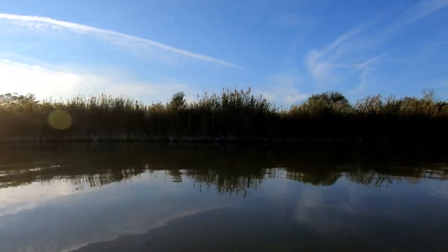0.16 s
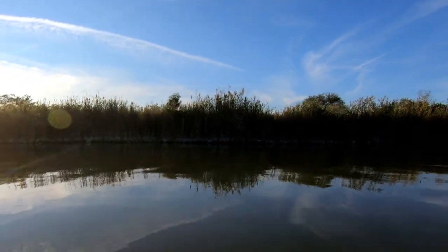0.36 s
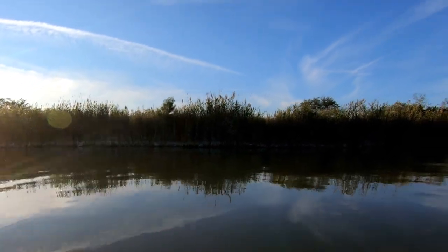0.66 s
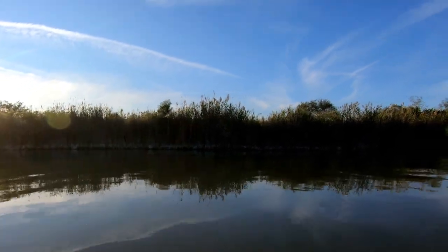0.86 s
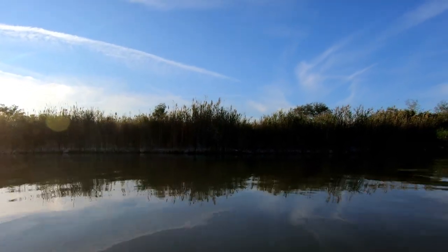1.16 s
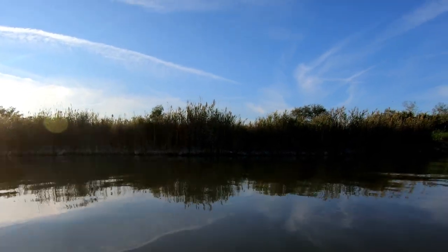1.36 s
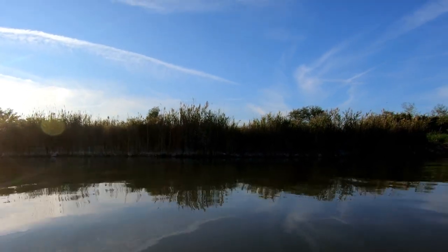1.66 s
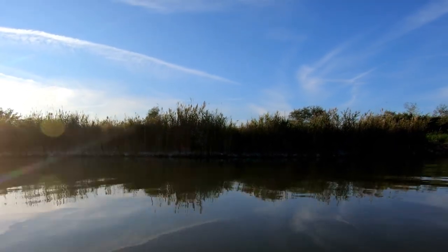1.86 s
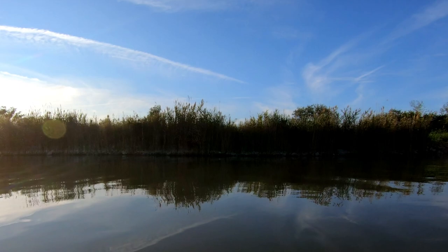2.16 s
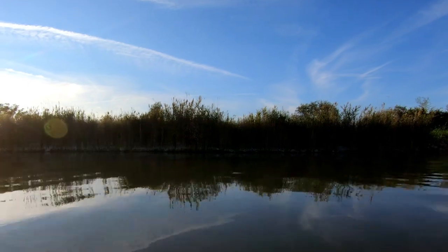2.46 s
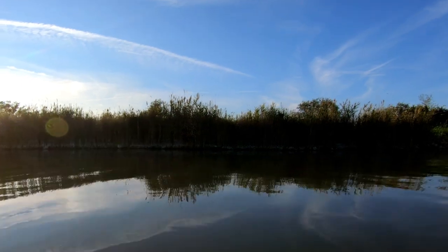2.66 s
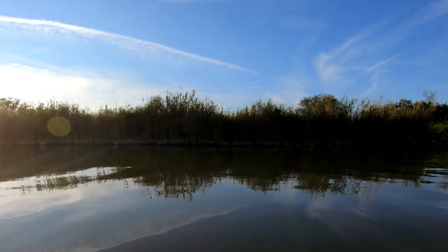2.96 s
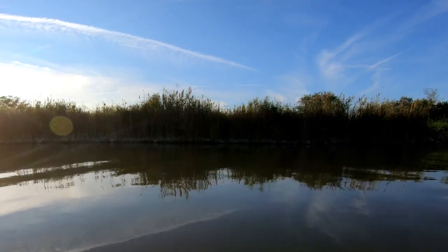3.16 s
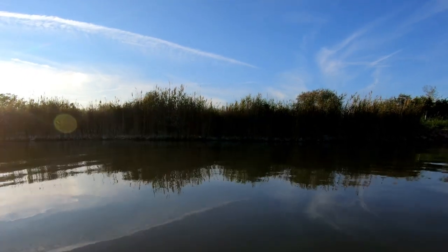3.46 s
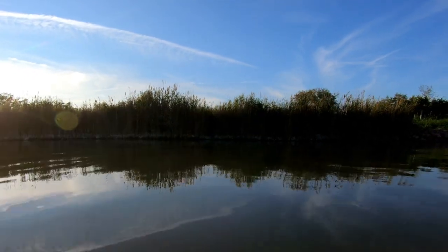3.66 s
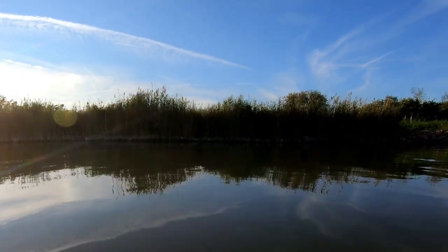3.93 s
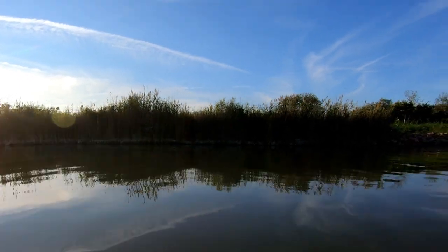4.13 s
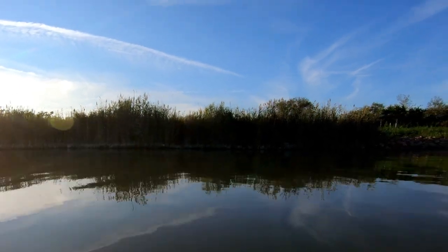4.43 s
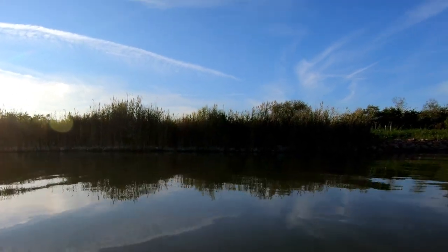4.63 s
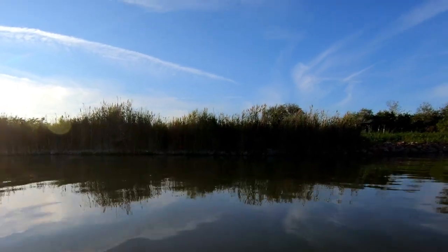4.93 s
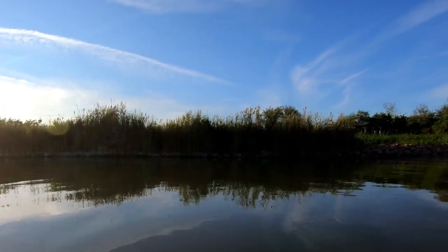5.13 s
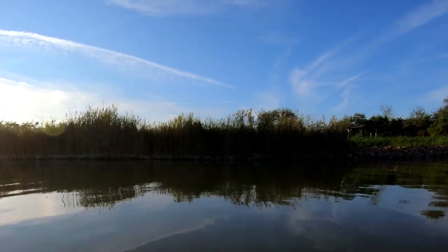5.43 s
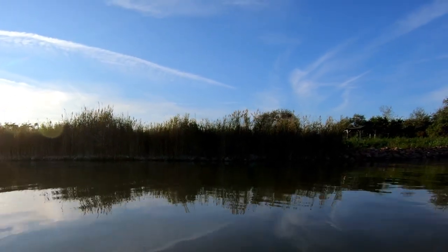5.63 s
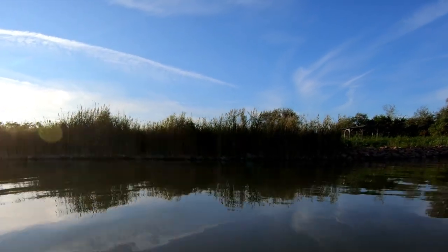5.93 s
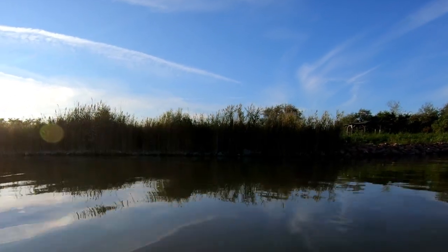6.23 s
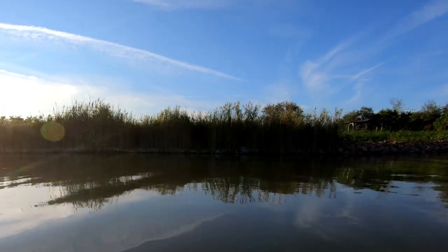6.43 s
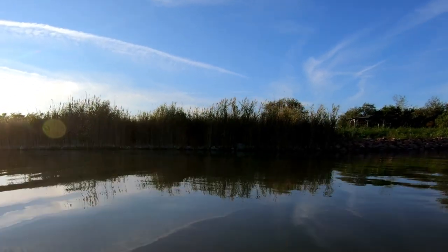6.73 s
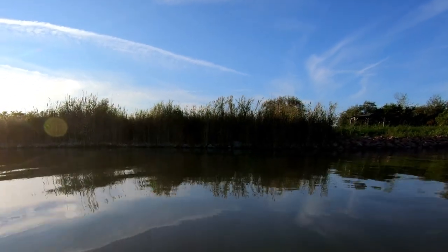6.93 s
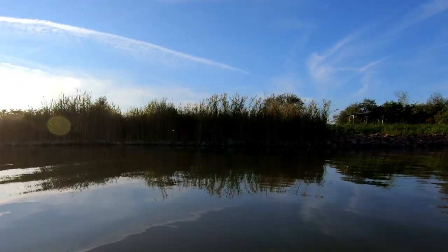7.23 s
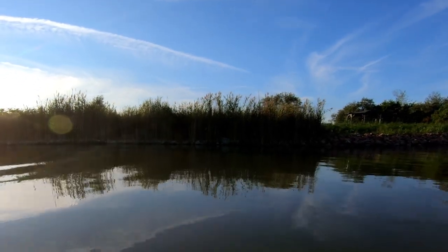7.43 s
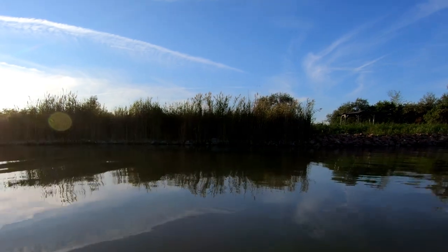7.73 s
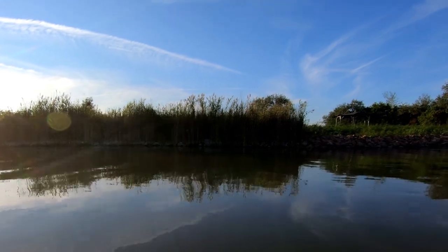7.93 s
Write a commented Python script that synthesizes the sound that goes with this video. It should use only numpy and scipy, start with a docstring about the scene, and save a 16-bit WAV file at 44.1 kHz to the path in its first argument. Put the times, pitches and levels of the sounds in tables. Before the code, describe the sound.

Paddling heard from inside an open boat. The clip opens mid-stroke with strong wind rumble and trickling drips, then swirls return about every two seconds, bubbling and splashing. Quiet glides between them hold single drops and small hull taps. A hard wooden-sounding rattle knock comes late, before a last splashy stroke. Distant low engine, very faint bird whistles and thin hiss stay underneath.

```python
"""A calm lake, where a canoe is paddled along. Each stroke churns up bubbles, made of short fading tones and noise.
Splashes, drops and knocks are bursts of random impacts that set water, air pockets or the hull ringing.
The open hull rings with standing waves across its width; light air buffets the left and right microphone ports.
Behind lie a distant rumble, a chugging engine made of filtered pulses, a small whistling bird
and a soft high hiss that comes and goes."""
import sys
import numpy as np
from scipy import signal
from scipy.fft import rfft, irfft, next_fast_len
from scipy.io import wavfile
from scipy.ndimage import uniform_filter1d, map_coordinates

SR = 44100
rng = np.random.default_rng(int(sys.argv[2]) if len(sys.argv) > 2 else 0)


def put_to_file(sound):
    """Save the sound as 16-bit audio at rate SR, in the file named by the first command-line argument."""
    columns = np.atleast_2d(sound).T  # one column per channel
    safe = np.clip(columns, -1, 1)
    whole_steps = np.round(safe * 32767)
    wavfile.write(sys.argv[1], SR, whole_steps.astype(np.int16))


N = 356769

# In all tables, pan_db is left minus right; levels in spectra are relative.
# the blade enters the water: start_s, hold_s, fall_db_per_s, slosh_db, froth_db
CATCHES = [(1.475, 0.009, 84, -50, -68), (3.543, .013, 23.5, -50, -65.5), (5.176, 0.061, 124.5, -47.5, -69),
           (7.512, 0.012, 71, -50.5, -82)]
CATCH_RISE_DB_PER_S = 109
# the blade swirls and lifts out at the end of each pull: start_s, length_s, slosh_db, froth_db
SWIRLS = [(.01, 0.24, -53, -72.5), (2.01, 0.14, -49, -61), (3.794, 0.21, -47, -72), (5.733, 0.29, -49, -72),
          (7.73, 0.15, -51.5, -72.5)]
SWIRL_RISE_DB_PER_S, SWIRL_FALL_DB_PER_S = 227, 72.5
FROTH_LAG_S = 0.069  # fine bubbles surface after the slosh
# the swirl's wave reaches the hull; its level is relative to the swirl's slosh
LAP_DELAY_S, LAP_WIDTH_S, LAP_DB = 0.38, 0.046, -6.5
IDLE_SLOSH_DB, IDLE_FROTH_DB = -64, -94.5  # the hull gliding between strokes
# colour of the slosh: pitch_hz, level_db
SLOSH_SPECTRUM = [(100, -38.5), (220, 8), (350, 12), (550, 7.5), (900, -1.5), (1400, 2.5), (2200, -9),
                  (4000, -25.5)]
# colour of the fine spray: pitch_hz, level_db
SPRAY_SPECTRUM = [(500, -26), (1000, -13), (1800, 27), (2800, -10), (4000, -24), (8000, -39), (10000, -25),
                  (12000, -31), (15000, -23)]

# the blade slaps and throws water: start_s, level_db, t60_s (time to fall 60 dB), pitch_hz, pan_db
SPLASHES = [(0.034, -37.5, 0.21, 1480, -1), (0.077, -49, 0.23, 1080, -16), (0.302, -50.5, 0.13, 1950, 11),
            (0.344, -40, 0.2, 1900, 22.5), (0.434, -36.5, 0.23, 1690, 8), (.651, -43, 0.13, 1810, 9),
            (1.048, -36.5, .1, 2050, 9.5), (1.055, -36.5, 0.041, 1790, 17), (1.298, -52.5, 0.18, 2320, 6),
            (1.97, -45, 0.15, 1320, -15), (2.224, -44, 0.22, 1850, 18), (2.71, -50.5, 0.21, 2920, 8),
            (3.12, -50, 0.16, 1700, 16), (3.498, -41, 0.089, 1590, -9), (3.934, -37, 0.065, 1800, 2.5),
            (4.029, -37, 0.15, 1910, 6.5), (4.7, -54.5, 0.41, 4200, 8), (4.785, -48, .1, 1470, 5.5),
            (5.12, -37.5, .2, 1760, 12.5), (5.191, -38.5, 0.19, 1750, 11), (5.297, -41.5, 0.088, 1850, 6),
            (5.33, -36.5, 0.071, 1730, 4.5), (5.819, -36.5, .14, 1790, 6.5),
            (5.976, -36.5, 0.11, 1730, 7.5), (6.075, -33.5, 0.077, 1880, 11),
            (7.067, -48.5, 0.45, 1800, 9.5), (7.495, -36, .12, 1580, -12), (7.666, -46.5, 0.13, 1570, 0),
            (7.899, -37.5, 0.41, 1810, 12)]
# colour of a splash at the pitch below: pitch_hz, level_db
SHOWER_SPECTRUM = [(500, -4.5), (1000, 7), (1800, 6), (3000, -1), (4200, -11), (5500, -5.5), (9000, -12.5),
                   (11000, -17), (15000, -41)]
SHOWER_HZ = 1800
PLIP_DB, PLIP_SPREAD, PLIP_CYCLES = 0, 0.45, 18  # tiny bubbles: level, spread of log pitch, cycles per t60

# the largest bubbles, with a few brief rings of the hull near 1.3 kHz: start_s, pitch_hz, level_db, t60_s,
# pan_db
BUBBLES = [(.027, 2000, -31, 0.0094, -11), (0.072, 1930, -40.5, 0.033, -1), (.075, 770, -29, 0.011, -16),
           (.088, 950, -38.5, 0.035, -12), (0.135, 1500, -52, .02, -1), (.432, 2260, -54, 0.018, -5),
           (0.45, 1300, -36.5, 0.039, -2.5), (.492, 2280, -50, 0.018, 10), (.507, 2650, -56, 0.017, 7),
           (.522, 2440, -46.5, 0.023, -6), (.542, 1355, -35.5, 0.015, -3), (.543, 2320, -49, 0.024, -1),
           (.583, 684, -41, 0.027, -1), (.659, 1830, -41, 0.014, -7), (.743, 2470, -55, 0.049, -4),
           (0.812, 1310, -47, 0.13, -14), (0.92, 1600, -43, 0.01, -2), (1.02, 2660, -63, 0.03, -8),
           (1.332, 2580, -50.5, 0.011, 15), (1.512, 2480, -62, 0.046, 6), (1.573, 1720, -47, 0.036, 4),
           (1.664, 1442, -33.5, 0.083, -8), (1.7, 3030, -48.5, 0.015, 1), (1.762, 1490, -44, 0.024, 2),
           (1.988, 1210, -44, 0.014, 12), (2.136, 1298, -26.5, 0.06, -14), (2.158, 553, -39, 0.068, 2),
           (2.308, 1326, -38.5, 0.049, 9), (2.389, 3150, -57, 0.016, 15), (2.716, 3560, -43.5, 0.007, 13),
           (2.954, 2620, -55, 0.025, 4), (3.29, 1070, -43, 0.051, -6), (3.318, 2160, -52, 0.018, -8),
           (3.424, 2380, -54, .02, 9), (3.474, 2350, -53.5, 0.029, -4), (3.501, 1250, -36, 0.086, 4),
           (3.736, 3200, -42.5, 0.011, -17), (3.83, 1640, -39, 0.021, 0), (3.934, 964, -35, 0.065, 10),
           (3.935, 1470, -29.5, 0.0095, 14), (3.935, 2600, -37, 0.0075, 22), (3.948, 2800, -46, 0.016, -8),
           (3.985, 2840, -53, .02, 4), (3.999, 733, -34.5, 0.1, 8), (4.004, 1526, -29.5, 0.028, 14),
           (4.031, 1240, -40, 0.083, -8), (4.04, 3250, -44, .012, 14), (4.133, 1950, -43, .018, 12),
           (4.181, 2220, -37, 0.039, 0), (4.255, 2060, -48.5, .025, -2), (4.34, 2320, -44, 0.037, -4),
           (4.354, 1945, -38, 0.034, -34), (4.387, 1490, -45, 0.085, 0), (4.784, 674, -38.5, 0.035, 6),
           (4.785, 483, -35.5, 0.034, -4), (4.841, 2170, -49, 0.021, -4), (4.887, 2220, -50, 0.028, 2),
           (4.946, 2470, -50, 0.046, -4), (5.182, 2270, -47, .015, 2), (5.218, 1090, -36, 0.019, 21),
           (5.244, 1510, -38, 0.036, 0), (5.622, 1930, -48, 0.019, -13), (5.701, 2030, -48, 0.019, -7),
           (5.649, 1527, -44.5, 0.036, -15), (5.773, 1120, -29, 0.013, -8), (5.826, 1230, -38, 0.023, -15),
           (5.923, 2650, -58, .012, 10), (5.94, 1260, -43, 0.017, 8), (5.983, 1055, -29.5, 0.034, 27),
           (6.047, 2150, -18.5, 0.0042, 24), (6.076, 1350, -43, 0.027, 24), (6.161, 2760, -48, 0.013, -9),
           (6.207, 1300, -35, 0.025, 1), (6.242, 1990, -47.5, 0.032, -10), (6.385, 1790, -43, 0.031, -5),
           (6.447, 2200, -45, 0.03, -3), (6.652, 1550, -46, 0.025, 10), (6.667, 2720, -60, .025, 9),
           (7.065, 997, -44, 0.065, 15), (7.408, 1920, -49, 0.041, -9), (7.422, 2820, -50, 0.007, -17),
           (7.499, 1227, -39, 0.058, -3), (7.668, 2340, -52.5, 0.049, -1), (7.67, 703, -40.5, 0.081, 3),
           (7.704, 1300, -34, 0.032, 1), (7.753, 1240, -37.5, 0.13, -4), (7.797, 1490, -36.5, 0.035, -1),
           (7.821, 1790, -44.5, 0.078, 11), (7.901, 2750, -32.5, 0.0039, 14), (7.999, 2120, -51, 0.02, 12)]
# air pockets that open at the surface: start_s, start_hz, end_hz, length_s, level_db, pan_db
GLUGS = [(0.311, 1470, 2060, 0.025, -42.5, 2), (1.912, 986, 1460, 0.024, -45, -15),
         (2.166, 2120, 2720, .022, -44.5, 20), (2.226, 1250, 2220, .016, -46, 13),
         (2.313, 1290, 2320, 0.046, -46.5, 6), (3.086, 1380, 2220, .04, -52.5, 18),
         (5.904, 1680, 2470, 0.019, -46.5, 18), (6.045, 2020, 3020, 0.011, -36.5, 20),
         (6.079, 1184, 1750, .018, -37, 23), (6.207, 1420, 2780, 0.027, -48.5, 14)]
# drops hitting the lake: start_s, tick_db, tick_hz, spatter_t60_s, plop_db, pan_db
DROPS = [(.170, -38, 6500, 0.025, -66, 11), (0.211, -49, 8000, 0.0054, -67, 11),
         (.264, -40, 8350, 0.037, -53, 11), (.299, -39, 8500, 0.033, -55, 0),
         (0.346, -31.5, 7800, 0.0098, -37, 4), (.377, -40, 6900, 0.012, -30, 8),
         (0.4554, -42, 5500, .04, -30, -18), (0.5557, -46.5, 6100, 0.009, -57, 10),
         (0.6505, -47.5, 6000, 0.023, -53, -8), (1.048, -43, 7640, 0.037, -39, 6),
         (1.177, -51.5, 4650, .02, -65, 10), (1.309, -45, 3960, 0.012, -65, 8),
         (1.4148, -40.5, 3460, .006, -68, 7), (2.13, -41, 5360, 0.0055, -53, 15),
         (2.203, -32, 3000, 0.0026, -18.5, 22), (2.2195, -48, 5500, .005, -60, 18),
         (2.2515, -46, 3200, 0.012, -32, 16), (2.3027, -47, 5000, .008, -45, 10),
         (2.4556, -39, 3760, 0.0034, -77, 13), (2.708, -44, 4000, .035, -70, 6),
         (3.057, -44, 2970, 0.0088, -56, 10), (3.1331, -64, 3970, 0.021, -34, 27),
         (3.199, -47.5, 4700, 0.0046, -41, 7), (3.5822, -48, 4800, .005, -65, -8),
         (3.918, -44, 4700, .008, -53, -8), (3.95, -34.5, 6300, 0.0094, -55, -21),
         (4.0205, -36.5, 4700, 0.0069, -48, 13), (4.026, -49, 6950, 0.039, -55, 4),
         (4.0522, -48, 3200, 0.012, -28, 10), (4.119, -36, 3200, 0.02, -47, 6),
         (4.1337, -42, 7700, 0.0063, -42, 8), (4.148, -45, 10100, 0.016, -65, 1),
         (4.2868, -44, 7740, .006, -47, 9), (4.4505, -49, 5700, 0.012, -69, -12),
         (4.604, -53.5, 4540, 0.014, -72, 3), (4.6427, -47, 6000, 0.0045, -62, 2),
         (4.6766, -44.5, 3550, 0.009, -65, 5), (4.743, -46, 5330, .012, -65, -2),
         (4.779, -40.5, 4030, 0.021, -48, 2), (5.081, -50, 6000, .03, -62, 3),
         (5.0988, -36.5, 5240, 0.0022, -60, 6), (5.128, -50, 8440, 0.04, -51, 3),
         (5.1986, -41, 3000, .04, -53, 1), (5.681, -38.5, 8500, 0.026, -52, 3),
         (5.7303, -33, 6600, 0.012, -45, -6), (5.8022, -38, 4000, 0.022, -50, 4),
         (5.8192, -36.5, 5540, .045, -50, 4), (6.045, -29, 5700, 0.0085, -29, 9),
         (6.0743, -38, 3240, .006, -30, 14), (6.202, -50, 6530, 0.054, -70, 5),
         (6.311, -46.5, 4340, 0.0064, -65, 2), (6.347, -51, 5000, .02, -41, -1),
         (6.3934, -52, 5500, 0.04, -50, -18), (6.642, -51, 5600, 0.044, -60, 5),
         (6.734, -46, 6000, 0.022, -65, -7), (6.8817, -50.5, 4700, 0.0056, -65, 10),
         (6.954, -52.5, 4970, 0.032, -68, 8), (7.28, -52, 4100, 0.012, -65, 0),
         (7.505, -45, 4230, 0.011, -55, -3), (7.5852, -45, 4930, .006, -65, -7),
         (7.6562, -43, 4100, 0.0047, -56, 0), (7.694, -45, 6960, 0.033, -50, -8),
         (7.7189, -40, 7700, .04, -62, 2), (7.77, -44, 9100, 0.025, -58, 3),
         (7.8116, -47, 8500, .02, -55, 13), (7.8406, -39.5, 6900, .045, -32, 7),
         (7.874, -43, 8500, .025, -38, 1), (7.9005, -31, 9000, 0.0036, -45, 14),
         (7.932, -41.5, 8500, .05, -46, 3), (7.97, -45, 7900, .04, -55, 3), (7.992, -48, 8450, .04, -60, 6)]
TICK_Q, SNAP_DB = 5, -6  # sharpness of a drop's ring; its broad snap relative to the ring

# blows on the hull, parts relative to the rattle: start_s, rattle_db, rattle_t60_s, thud_db, thud_hz,
# crack_db, cross_ring_db
KNOCKS = [(1.463, -46, 0.24, 14, 360, -8, -9), (1.9723, -35.5, 0.13, 2.5, 306, -9.5, -17),
          (3.371, -37, 0.1, 5, 323, -10.5, -27), (3.999, -32.5, 0.059, 4, 303, -26, -12),
          (4.783, -37, 0.086, -3, 485, -22, -18), (6.7511, -19, 0.1, -21.5, 340, -8.5, -20.5),
          (7.228, -47, 0.21, 10, 445, -17, -10), (7.318, -43.5, 0.076, 10.5, 300, -13, -10.5)]
# rattling resonances of the hull wall: pitch_hz, width_hz, level_db
WALL = [(333, 14, -11.5), (493, 7.9, 5), (687, 15, 9), (770, 47, 17.5), (918, 11, 9.5), (1098, 83, 13.5),
        (1490, 300, 12), (1790, 210, 8.5), (2080, 82, 3), (2640, 180, -27), (3220, 320, -1)]
# standing waves across the hull: pitch_hz, width_hz, level_db
CROSS_MODES = [(720, 70, -27), (1256, 19, 4.5), (1310, 19.7, 6), (1530, 19, 0)]
# phase of the left port ahead of the right: pitch_hz, lead_radians
PORT_PHASE = [(0, -6), (400, 1), (700, 0.93), (1000, 1.5), (1400, 4), (1850, 4.0), (2400, 4.5), (3300, 7.5),
              (5000, 7.5), (8000, 10)]

# stray bubbles along the gliding hull, small and tiny
TRICKLE_DB, TINKLE_DB = -72, -87
TRICKLE_FOLLOWS = .55  # dB of trickle for each dB of froth

# the breeze on the ports: time_s, level_db, pan_db
BREEZE = [(0, -18, -1), (.17, -24, 19), (.35, -35, 15), (.8, -43, -3), (1.1, -61, 10), (1.4, -46, -10),
          (1.66, -25, -2.5), (1.92, -33, -5), (2.33, -32.5, 0), (2.47, -50, 7), (2.62, -37, -1),
          (2.92, -49, 2), (3.3, -27.5, -8.5), (3.9, -44, 10.5), (4.4, -35.5, 11), (4.75, -31.5, 11),
          (5.02, -42.5, 12), (5.25, -32, 2.5), (5.8, -31.5, -3), (6.02, -36.5, 5), (6.12, -42, 11),
          (6.65, -49, -2), (7.4, -38.5, -2.5), (7.84, -32, 5.5), (8.09, -44, 12)]
# brief puffs on top of it: centre_s, width_s, level_db, pan_db
PUFFS = [(.47, 0.02, -32.5, 14), (0.961, 0.024, -32.5, 2), (1.79, 0.012, -28, -5), (2.3, 0.043, -30, -9),
         (3.068, 0.05, -30, -9.5), (3.307, 0.019, -25, 24), (4.495, 0.013, -26, 20), (4.611, 0.01, -33, 19),
         (4.755, 0.052, -26.5, 1), (6.23, 0.0072, -30.5, 24), (6.448, 0.014, -25.5, -9.5),
         (7.31, 0.0056, -27, -1), (7.851, 0.018, -26, 8)]
STRONGEST_PUFF_DB = -22  # stronger gusts are held to this
# colour of the moving air: pitch_hz, level_db
AIR_SPECTRUM = [(12, -19), (25, -3), (45, 3), (70, -1.5), (110, -8), (160, -33), (250, -39), (400, -43.5),
                (800, -49.5), (2000, -104)]
# colour of the eddies: pitch_hz, level_db
EDDY_SPECTRUM = [(60, -28), (120, 9.5), (170, 5), (250, -5), (400, -17.5), (800, -39), (2000, -54)]

# level of the distant rumble: time_s, level_db
RUMBLE_LEVEL = [(0, -47.5), (1.4, -46.5), (2.8, -48), (8.09, -47)]
# colour of the rumble: pitch_hz, level_db
RUMBLE_SPECTRUM = [(20, -3), (60, 2), (105, -3.5), (155, -0.5), (200, -1), (330, -7), (400, -10.5),
                   (480, -14.5), (800, -11.5), (1200, -17.5), (1600, -30), (2200, -44), (9000, -58),
                   (12000, -54.5)]
# left-right likeness of the rumble, 1 for the same and -1 for opposite: pitch_hz, likeness
RUMBLE_ALIKE = [(60, 0.71), (110, 0.96), (180, 0.95), (330, 0.96), (540, 0.87), (940, -0.028), (1300, -1.1),
                (2800, 0.075)]

CYCLE_HZ = 17.0  # working cycles a second of the far-off engine
CARRY_HZ = 422  # its sound is lost above this pitch
# its cylinders: lateness_s, level_db
CYLINDERS = [(0, 0), (.0007, -8), (-.0005, -10)]
# resonances of its exhaust: pitch_hz, width_hz, level_db
EXHAUST = [(105.3, 30.4, 2), (153.4, 24, -1), (204.3, 35, -13), (257.5, 27, -6.5), (327, 39.5, -7.5),
           (392.7, 38, -11)]
# its level: time_s, level_db
ENGINE_LEVEL = [(0, -44.5), (1.5, -45.5), (2.8, -48), (5, -52.5), (8.09, -50.5)]

# rising whistles of a small bird: start_s, start_hz, end_hz, length_s, level_db
WHISTLES = [(.66, 4100, 5100, .08, -87), (1.49, 2950, 4500, .12, -79), (2.93, 3050, 4750, .115, -80.5),
            (4.95, 2850, 4100, .13, -82)]
# level of the high hiss: time_s, level_db
HISS_LEVEL = [(0, -89), (.3, -68.5), (.55, -74), (.8, -81), (1.25, -76.5), (1.35, -71.5), (1.72, -73),
              (2.2, -75.5), (2.35, -73.5), (2.46, -71.5), (2.7, -67), (2.78, -78.5), (2.92, -90),
              (3.08, -76), (3.43, -81), (3.58, -72.5), (4.05, -69), (4.3, -78), (4.55, -79.5), (5.0, -80),
              (5.15, -73), (5.38, -74.5), (5.55, -71), (6.02, -73.5), (6.15, -75), (6.45, -77.5),
              (6.6, -70.5), (6.75, -77.5), (7.3, -76.5), (7.5, -70.5), (7.9, -77), (8.09, -72)]
# colour of the high hiss: pitch_hz, level_db
HISS_SPECTRUM = [(1200, -42), (2400, 1), (3500, 12), (5000, 6), (7200, 5.5), (8400, 9), (9400, 10),
                 (10200, 5), (11200, -22), (15000, -42)]

TOP_HZ = 15450  # upper band limit of the microphone


def churn():
    """The blade stirs the water: low slosh, a swarm of bubbles and fine crackle, all growing with the stroke."""
    stir, froth = stroke()
    slosh = stir * amp(-0.5 + 6.07 * wobble(25)) * noise(SLOSH_SPECTRUM, [(200, 0.13), (900, 0.035)])
    gurgle = stir * amp(-5.5) * swarm(count=1100, centre_hz=1250, spread=.3, cycles=22, scatter_db=4)
    fizz = froth * amp(3.5) * swarm(count=750, centre_hz=2100, spread=.3, cycles=26, scatter_db=4.5)
    crackle = froth * amp(-9) * swarm(count=1100, centre_hz=5800, spread=.35, cycles=10, scatter_db=4.5)
    spray = froth * amp(-19 + 5 * wobble(110)) * noise(SPRAY_SPECTRUM, [(1000, .4), (5000, .1)])
    return aboard(fizz + crackle + spray, hull_db=23.0) + aboard(slosh + gurgle, hull_db=5)


def stroke():
    """Strength of slosh and of froth: catches, swirls and the waves that lap the hull, joined by power."""
    slosh, froth = [np.full(N, amp(IDLE_SLOSH_DB))], [np.full(N, amp(IDLE_FROTH_DB))]
    for s, hold, fall_rate, slosh_db, froth_db in CATCHES:
        catch = surge(s, hold, CATCH_RISE_DB_PER_S, fall_rate)
        slosh.append(amp(slosh_db) * catch)
        froth.append(amp(froth_db) * catch)
    for s, length, slosh_db, froth_db in SWIRLS:
        swirl = surge(s, length, SWIRL_RISE_DB_PER_S, SWIRL_FALL_DB_PER_S)
        lap = amp(LAP_DB) * swell(s + length + LAP_DELAY_S, LAP_WIDTH_S)
        slosh.append(amp(slosh_db) * (swirl + lap))
        late_swirl = surge(s + FROTH_LAG_S, length, SWIRL_RISE_DB_PER_S, SWIRL_FALL_DB_PER_S)
        froth.append(amp(froth_db) * late_swirl)
    return np.linalg.norm(slosh, axis=0), np.linalg.norm(froth, axis=0)


def splashes():
    """A slap of the blade breaks into a quick shower of tiny impacts and plips; finer spray sounds higher."""
    out, t = np.zeros((2, N)), np.arange(SR // 4) / SR
    for s, db, t60, hz, pan_db in SPLASHES:
        shower = spatter(t, t60, spikiness=1.0) * (1 - np.exp(-t / .002))
        shower = filtered(shower, lambda f: amp(along(SHOWER_SPECTRUM, f * SHOWER_HZ / hz)))
        plip = peaked(plips(t, 1.098 * hz, t60, count=28))
        splash = peaked(peaked(shower) + amp(PLIP_DB) * plip)
        add(out, s, amp(db) * panned(pan_db) * splash)
    return aboard(out, hull_db=6.0)


def plips(t, centre_hz, t60, count):
    """A dying cluster of tiny bubbles round one pitch."""
    delays = t60 / 2 * rng.random((count, 1)) ** 2
    hz = centre_hz * np.exp(PLIP_SPREAD * rng.standard_normal((count, 1)))
    rings = bubble(np.maximum(t - delays, 0), hz, PLIP_CYCLES / hz, rise=.15, attack=.0004)
    return (amp(-40 * delays / t60) * rings).sum(0)


def bubbles():
    """Larger air pockets from the blade and drops, and a few brief rings of the hull, sound one by one, each
    amid a little froth of like size."""
    out, t = np.zeros((2, N)), np.arange(SR // 8) / SR
    for s, hz, db, t60, pan_db in BUBBLES:
        ring = bubble(t, hz, t60, rise=.12, attack=.002)
        froth = spatter(t, min(.055, 0.01 + 3 * t60), spikiness=1.0) * (1 - np.exp(-t / 0.0028))
        froth = filtered(froth, lambda f: resonance(f, hz, hz / 2) ** 2)
        add(out, s, amp(db) * panned(pan_db) * (peaked(ring) + amp(-7) * peaked(froth)))
    return aboard(scattered(out, wet_db=-9.0, t60=0.12), hull_db=3.5)


def glugs():
    """An air pocket shrinks as it opens at the surface, so its pitch sweeps up while it fades."""
    out = np.zeros((2, N))
    for s, start_hz, end_hz, length, db, pan_db in GLUGS:
        u = np.linspace(0, 1, int(length * SR))  # progress through the sweep
        hz = start_hz * (end_hz / start_hz) ** u * (1 + .04 * wobble(500)[:len(u)])
        tone = np.sin(2 * np.pi * np.cumsum(hz) / SR)
        fade = np.sqrt(u) * (1 - u) * amp(3 * wobble(250)[:len(u)])
        add(out, s, amp(db) * panned(pan_db) * peaked(tone * fade))
    return aboard(scattered(out, wet_db=-10.5, t60=0.053), hull_db=-5)


def drops():
    """Each drop strikes a tick and a brief spatter that ring a tiny bubble, and plops in its crater."""
    out, t = np.zeros((2, N)), np.arange(SR // 12) / SR

    def snap(f):
        return resonance(f, 4000, 4400) * resonance(f, 7100, 8000)

    for s, tick_db, hz, t60, plop_db, pan_db in DROPS:
        impact = peaked(spatter(t, t60, spikiness=.9) * (1 - np.exp(-8 * t / t60)))
        tick = filtered(impact, lambda f: resonance(f, hz, hz / TICK_Q) + amp(SNAP_DB) * snap(f))
        push = (t == 0) + amp(-12) * spatter(t, 0.005, spikiness=0.2)  # one click and a short spatter
        plop = filtered(push, lambda f: resonance(f, 1250, 1000) ** 2)
        add(out, s, panned(pan_db) * (amp(tick_db) * peaked(tick) + amp(plop_db) * peaked(plop)))
    return aboard(scattered(out, wet_db=-12, t60=0.082), hull_db=-3.5)


def knocks():
    """The paddle shaft meets the hull: thud, crack and rattling wall, then standing waves build and ring on."""
    out, t = np.zeros((2, N)), np.arange(SR // 3) / SR

    def wall_response(f):
        return modes(f, WALL) / (1 + (f / 3200) ** 4)

    for s, db, t60, thud_db, thud_hz, crack_db, ring_db in KNOCKS:
        contact = np.array([spatter(t, t60, spikiness=0.27) for port in range(2)])
        wall = filtered(contact, wall_response)
        thud = filtered(spatter(t, 1.02 * t60, spikiness=0.017), lambda f: resonance(f, thud_hz, 232) ** 2)
        crack_fade = amp(-60 * t / .016) + amp(-10) * amp(-60 * t / .07)  # sharp, with a longer tail
        crack = rng.standard_normal((2, len(t))) * crack_fade * (1 - np.exp(-t / 0.0005))
        crack = filtered(crack, lambda f: resonance(f, 5200, 3100) ** 2)
        ring = sum(amp(level) * np.sin(2 * np.pi * hz * t) * np.exp(-np.pi * width * t)
                   for hz, width, level in CROSS_MODES)
        ring = peaked(ring * t) * np.array([[1], [-1]])  # the two sides of the hull swing in opposite phase
        blow = peaked(wall) + amp(thud_db) * peaked(thud) + amp(crack_db) * peaked(crack) + amp(ring_db) * ring
        add(out, s, amp(db) * blow)
    # shape the top treble, with a lift round 10 kHz
    out = filtered(out, lambda f: amp(along([(7000, 1.34), (10000, 6.1), (12000, 1)], f)))
    return aboard(out, hull_db=18)


def trickle():
    """Stray bubbles burst along the hull, more strongly while the water is frothed."""
    froth = stroke()[1]
    small = amp(TRICKLE_DB) * swarm(count=320, centre_hz=2000, spread=.25, cycles=26, scatter_db=3)
    tiny = amp(TINKLE_DB) * swarm(count=320, centre_hz=5200, spread=.24, cycles=14, scatter_db=4)
    return aboard(unit(froth) ** TRICKLE_FOLLOWS * (small + tiny), hull_db=2.0)


def buffet():
    """Air presses on each port separately, in soft lumps; stronger puffs break into finer eddies."""
    breeze_db, pan_db = curves(BREEZE)
    strength = amp(breeze_db) * panned(pan_db)
    for s, width, db, puff_pan_db in PUFFS:
        strength = np.hypot(strength, amp(db) * panned(puff_pan_db) * swell(s, width))
    air = noise(AIR_SPECTRUM, [(40, 0.38), (200, 0.015)])
    # even out the noise's own swells, so that the gusts set most of the strength
    air = air / np.sqrt(np.abs(uniform_filter1d(air ** 2, size=3500)) + 0.062)
    lumps = strength * amp(2.9 * np.array([wobble(21), wobble(18)]))
    push = np.minimum(lumps, amp(STRONGEST_PUFF_DB)) * air
    eddy_strength = np.minimum(strength, amp(STRONGEST_PUFF_DB)) ** 1.428
    return push + eddy_strength * noise(EDDY_SPECTRUM, [(200, 0.21)])


def bird():
    """Each faint call is one quavering upward glide."""
    out = np.zeros((2, N))
    for s, start_hz, end_hz, length, db in WHISTLES:
        u = np.linspace(0, 1, int(length * SR))  # progress through the call
        quaver = wobble(120)[:len(u)]
        hz = (start_hz + (end_hz - start_hz) * u ** 1.3) * (1 + .01 * quaver)
        tone = np.sin(2 * np.pi * np.cumsum(hz) / SR)
        add(out, s, amp(db + 2.5 * quaver) * tone * np.sin(np.pi * u))
    return scattered(out, wet_db=-6, t60=.1)


def engine():
    """A far-off engine chugs: three uneven firings a cycle ring its exhaust; only the bass carries over water."""
    level_db, = curves(ENGINE_LEVEL)
    cycles, firings = np.arange(1, N / SR * CYCLE_HZ - 1), np.zeros(N + SR)
    for k, (late, db) in enumerate(CYLINDERS):
        when = (cycles - 1 + (k + .5) / len(CYLINDERS)) / CYCLE_HZ + late
        firings[(when * SR).astype(int)] = amp(db + rng.standard_normal(len(when)))

    def carried(f):
        pipe = sum((-1) ** k * amp(db) * resonance(f, hz, width) for k, (hz, width, db) in enumerate(EXHAUST))
        return pipe / (1 + (f / CARRY_HZ) ** 12)

    return amp(level_db) * unit(filtered(firings[:N], carried))


def rumble():
    """A distant rumble: coloured noise whose left-right balance depends on pitch."""
    level_db, = curves(RUMBLE_LEVEL)
    distant = amp(level_db) * noise(RUMBLE_SPECTRUM, RUMBLE_ALIKE)
    balance_db = [(300, -0.5), (850, -5.5), (1300, -22.0), (3000, -1.0)]  # pitch_hz, pan_db
    return filtered(distant, lambda f: panned(along(balance_db, f)))


def hiss():
    """High coloured noise that swells and fades."""
    level_db, = curves(HISS_LEVEL)
    level_db = level_db + 1.6 * wobble(13)
    return amp(level_db) * panned(3.3) * noise(HISS_SPECTRUM, [(2500, 0.57), (7000, -0.52)])


def aboard(x, hull_db):
    """The ports hear sound out of step; the hull's standing waves swing them in opposite phase."""
    ring = filtered(x.mean(0), lambda f: modes(f, CROSS_MODES))
    sides = np.array([[1], [-1]])
    direct = filtered(x, lambda f: np.exp(.5j * along(PORT_PHASE, f) * sides))
    return direct + amp(hull_db) * np.array([ring, -ring])


def scattered(x, wet_db, t60):
    """Echoes from the boat's inside smear each sound a little, differently at each port."""
    t = np.arange(SR // 12) / SR
    tail = rng.standard_normal((2, len(t))) * amp(-60 * t / t60) * (1 - np.exp(-t / 0.00042))
    return x + amp(wet_db) * signal.fftconvolve(x, tail / np.linalg.norm(tail[0]), axes=1)[:, :N]


def bubble(t, hz, t60, rise, attack):
    """A ringing air pocket; its pitch climbs as it nears the surface."""
    phase = 2 * np.pi * hz * t * (1 + rise * np.minimum(t / t60, 1) / 2)
    return np.sin(phase) * amp(-60 * t / t60) * (1 - np.exp(-t / attack))


def swarm(count, centre_hz, spread, cycles, scatter_db):
    """Many small bubbles at random times, pitches and places; rms 1."""
    when, size, place = rng.random((count, 3)).T
    hz = np.clip(centre_hz * np.exp(spread * rng.standard_normal(count)), 300, 13000)[:, None]
    t = np.arange(SR // 30) / SR
    rings = bubble(t, hz, cycles / hz, rise=.2, attack=.0006)
    rings = rings * amp(-scatter_db * np.log(size + 0.009))[:, None]  # a few loud, many quiet
    index = (when * N).astype(int)[:, None] + np.arange(len(t))
    ports = [np.bincount(index.ravel(), (rings * gain[:, None]).ravel(), N)[:N]
             for gain in panned(24 * (place - .5))]
    return unit(np.array(ports))


def spatter(t, t60, spikiness):
    """A dying train of tiny random impacts: noise whose strength jumps every 32 samples."""
    bursts = np.exp(spikiness * rng.standard_normal(len(t) // 32 + 1)).repeat(32)[:len(t)]
    return rng.standard_normal(len(t)) * bursts * amp(-60 * t / t60)


def surge(s, hold, rise_rate, fall_rate):
    """A gain that rises to 1 at time s, holds and dies away; rates in dB a second."""
    t = np.arange(N) / SR - s
    return amp(rise_rate * np.minimum(t, 0) - fall_rate * np.maximum(t - hold, 0))


def swell(s, width):
    """A soft bell-shaped gain round time s."""
    return np.exp(-((np.arange(N) / SR - s) / width) ** 2 / 2)


def amp(db):
    """Decibels to gain."""
    return 10 ** (np.asarray(db) / 20)


def unit(x):
    """Scale to rms 1 (an average strength of 1)."""
    return x / np.sqrt(np.mean(x ** 2) + 1e-20)


def peaked(x):
    """Scale to peak 1."""
    return x / (np.abs(x).max() + 1e-20)


def along(points, hz):
    """Read a curve of (Hz, value) points on a log pitch axis."""
    f, v = np.transpose(points)
    return np.interp(np.log(hz + 1), np.log(f + 1), v)


def curves(rows):
    """One value per sample for each column after the time."""
    s, *cols = np.transpose(rows)
    return [np.interp(np.arange(N) / SR, s, c) for c in cols]


def wobble(rate):
    """A smooth random curve, rate knots a second."""
    return map_coordinates(rng.standard_normal(int(N * rate / SR) + 4), [np.arange(N) * rate / SR])


def filtered(x, response):
    """Reshape x by a complex response of frequency."""
    n = x.shape[-1]
    m = next_fast_len(n + 8192)
    return irfft(rfft(x, m) * response(np.fft.rfftfreq(m, 1 / SR)), m)[..., :n]


def resonance(f, hz, width):
    """Causal response of one resonance, 1 at its centre."""
    return 1j * f * width / (hz * hz - f * f + 1j * f * width)


def modes(f, table):
    """Summed response of a table of resonances."""
    return sum(amp(db) * resonance(f, hz, width) for hz, width, db in table)


def noise(spectrum, alike):
    """Stereo noise of rms 1 with a given colour and left-right likeness."""
    def mid_side(hz):
        turn = np.arccos(np.clip(along(alike, hz), -1, 1)) / 2
        return amp(along(spectrum, hz)) * [np.cos(turn), np.sin(turn)]

    mid, side = filtered(rng.standard_normal((2, N)), mid_side)
    return unit(np.array([mid + side, mid - side]))


def panned(pan_db):
    """Left and right gains of mean power 1."""
    gains = amp(np.array([np.atleast_1d(pan_db), -np.atleast_1d(pan_db)]) / 2)
    return gains / np.sqrt(np.mean(gains ** 2, axis=0))


def add(track, s, sound):
    """Mix a sound into the track at time s."""
    part = track[:, max(round(s * SR), 0):][:, :sound.shape[-1]]
    part += sound[..., :part.shape[1]]


def scene():
    """Water, paddle, air and distance together."""
    water = churn() + splashes() + bubbles() + glugs() + drops() + trickle()
    background = bird() + engine() + rumble() + hiss()
    return water + knocks() + buffet() + background


def record(dry):
    """The microphone dulls the top treble and keeps nothing above its band limit."""
    treble_db = [(9500, 0.5), (11500, -12.0), (15000, -19.5)]  # pitch_hz, level_db
    return filtered(dry, lambda hz: amp(along(treble_db, hz)) * (hz < TOP_HZ))


dry = scene()
out = record(dry)
put_to_file(out)
```